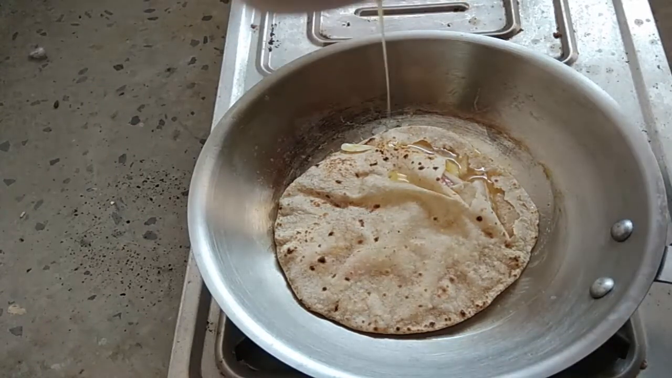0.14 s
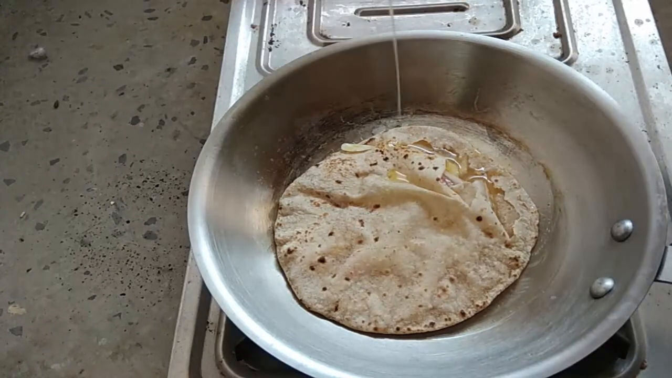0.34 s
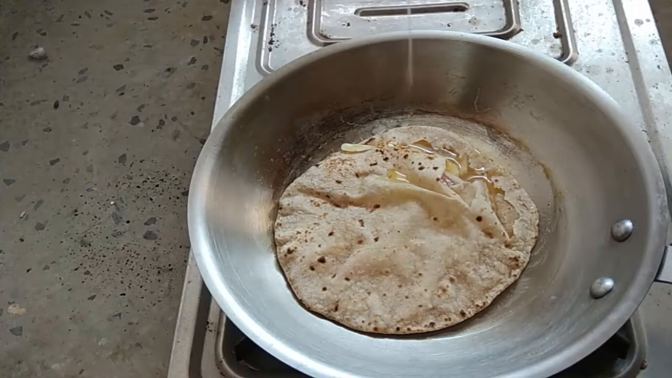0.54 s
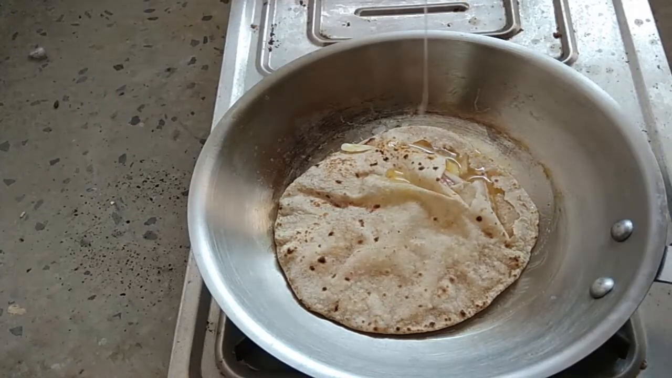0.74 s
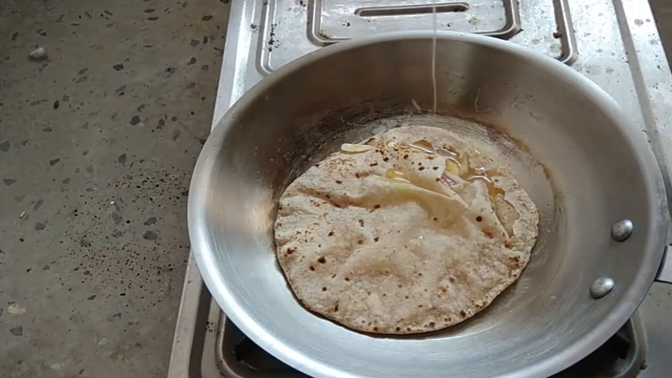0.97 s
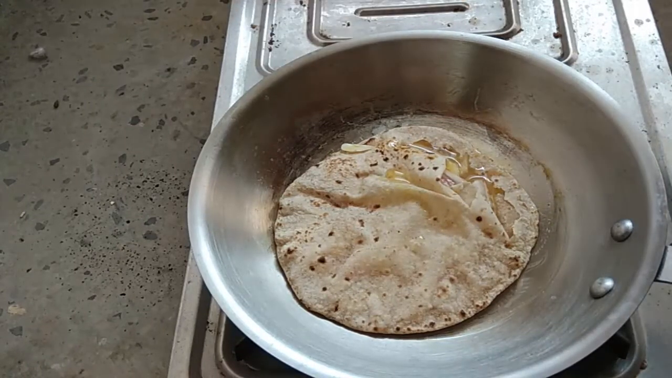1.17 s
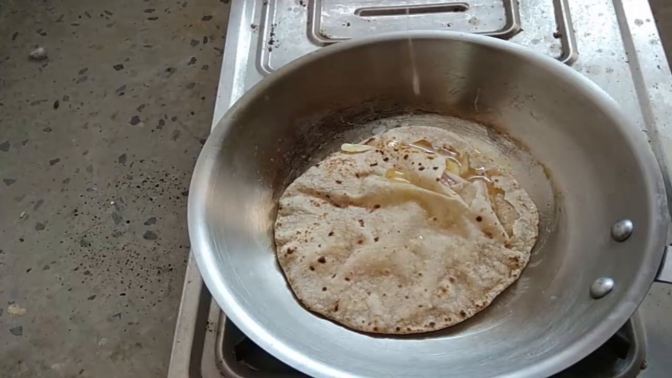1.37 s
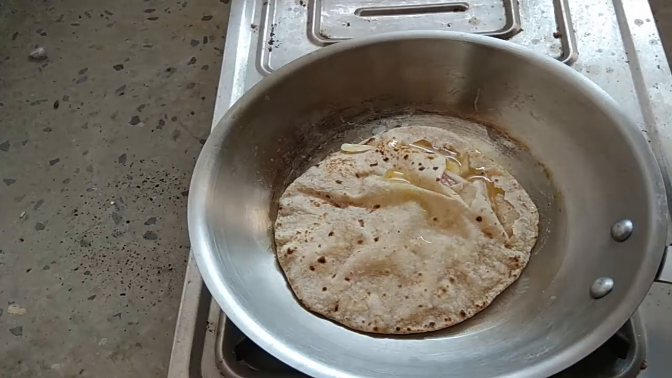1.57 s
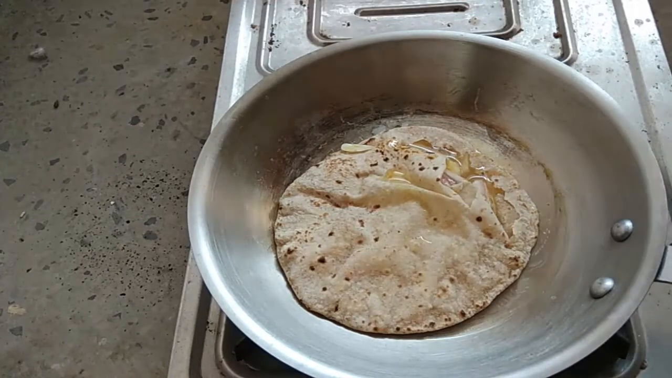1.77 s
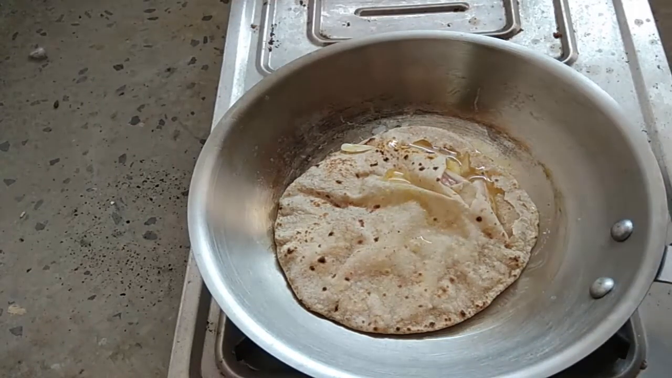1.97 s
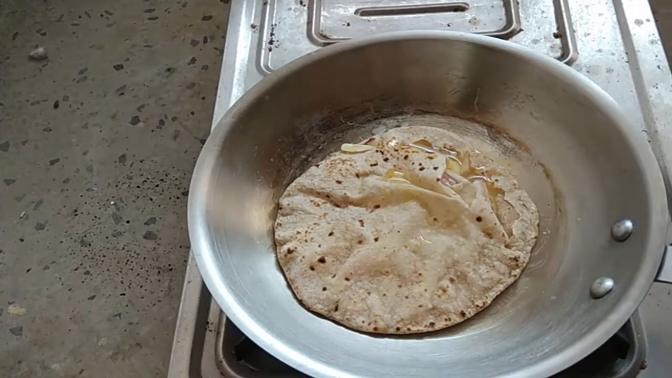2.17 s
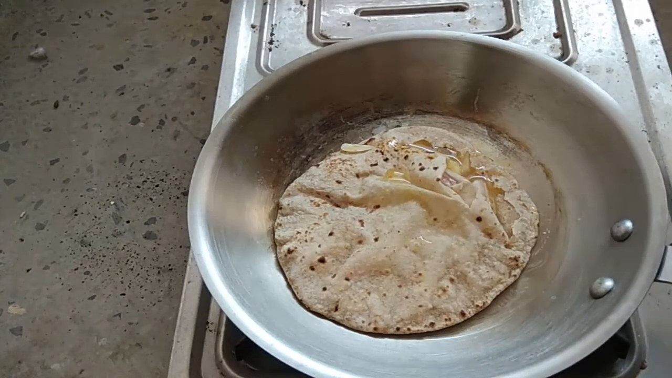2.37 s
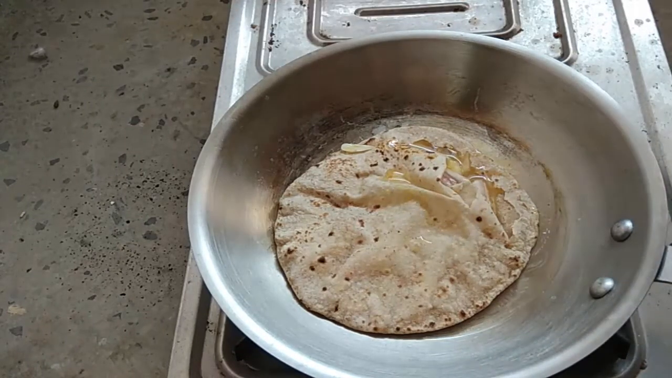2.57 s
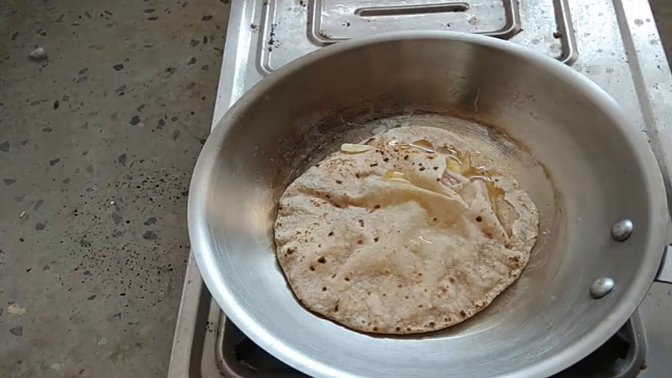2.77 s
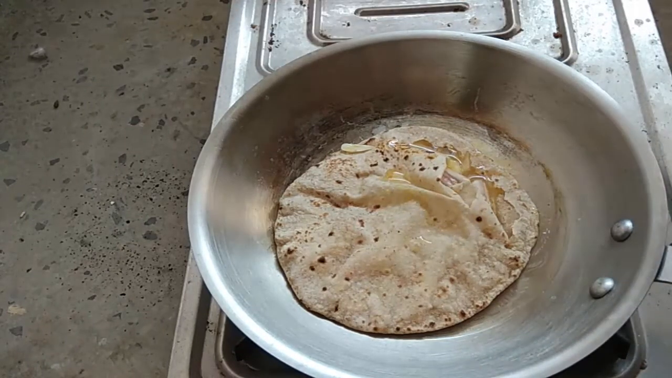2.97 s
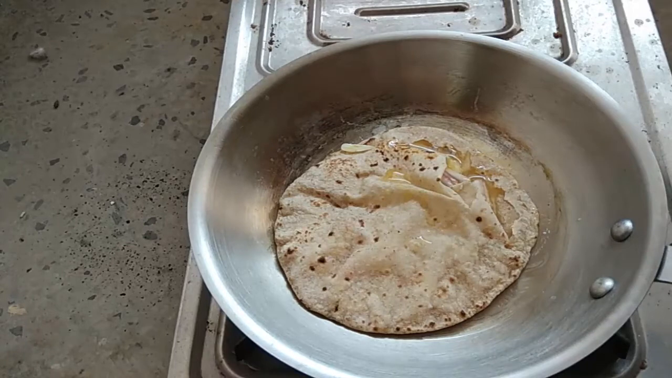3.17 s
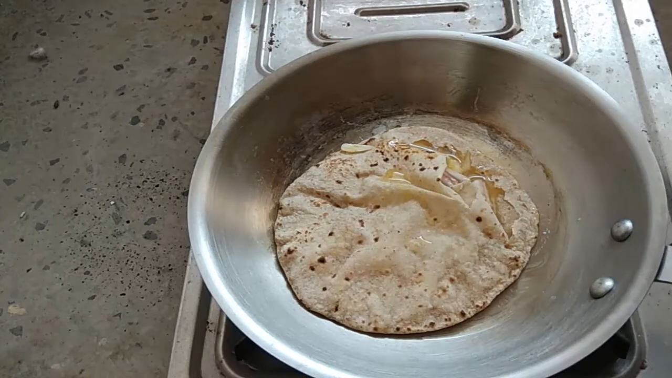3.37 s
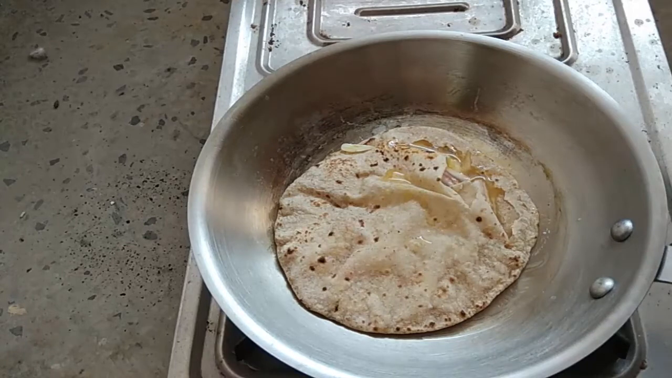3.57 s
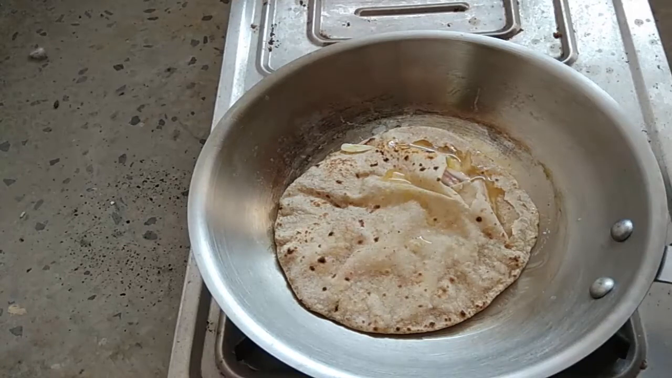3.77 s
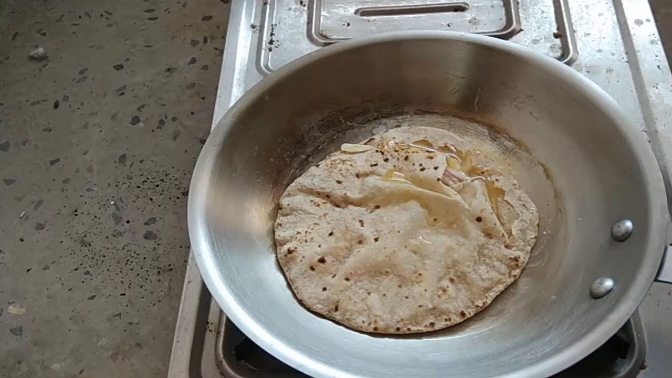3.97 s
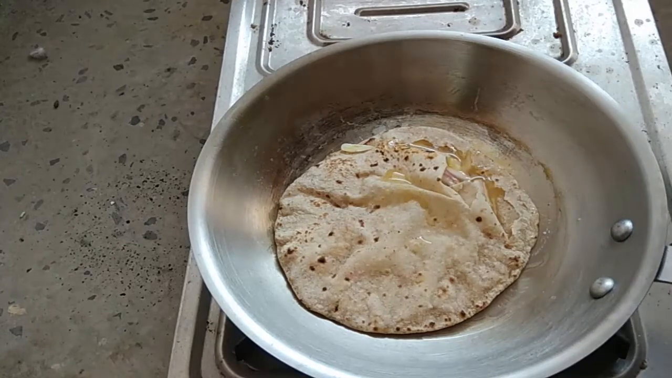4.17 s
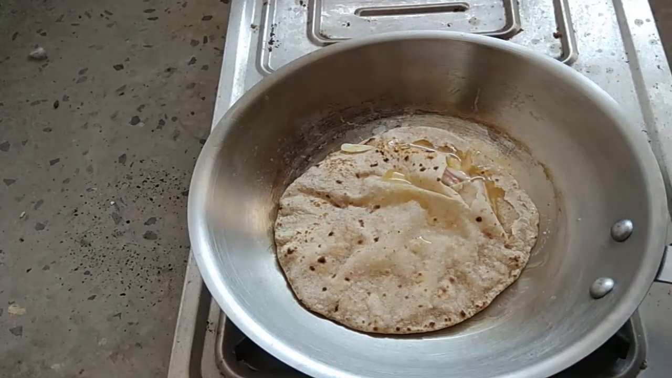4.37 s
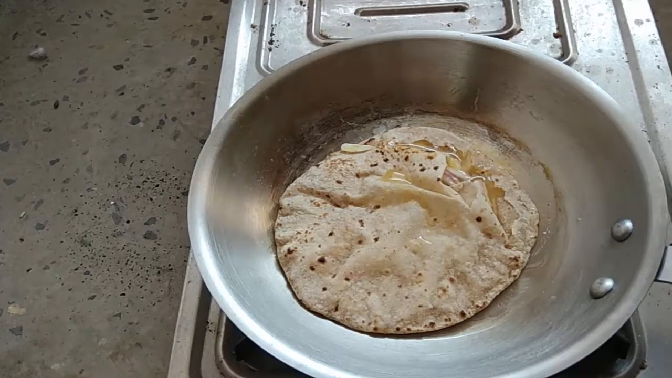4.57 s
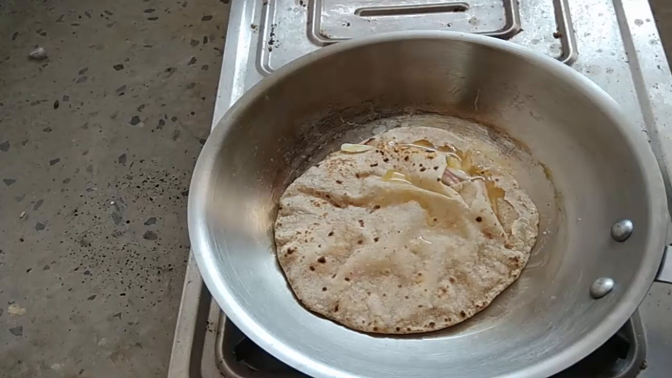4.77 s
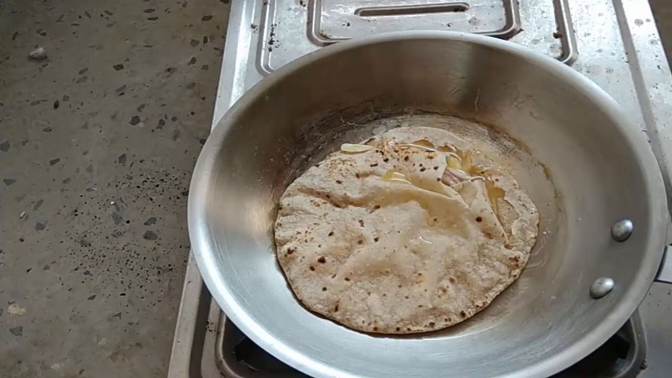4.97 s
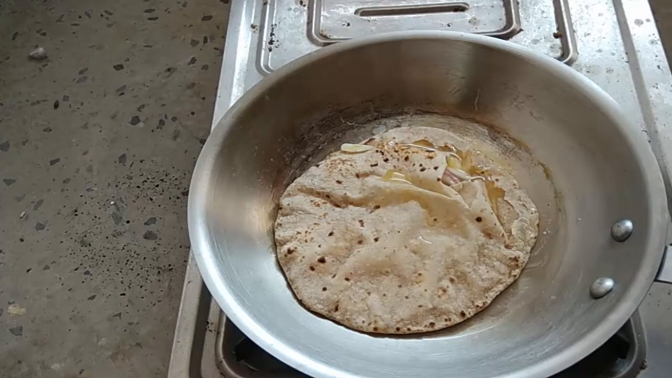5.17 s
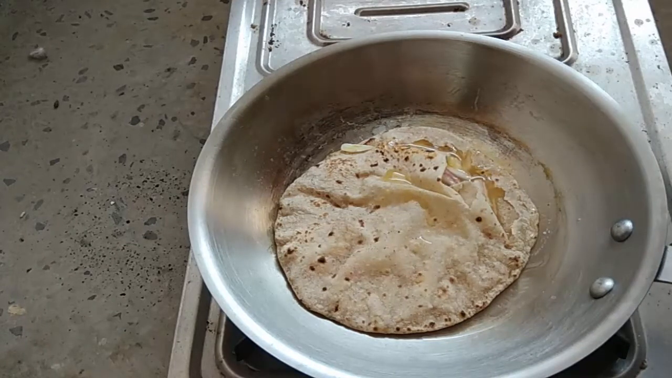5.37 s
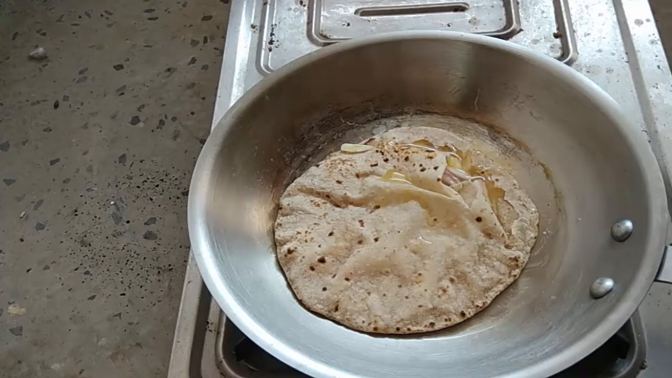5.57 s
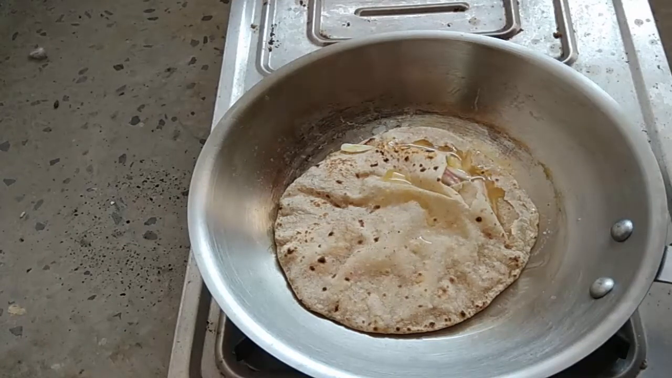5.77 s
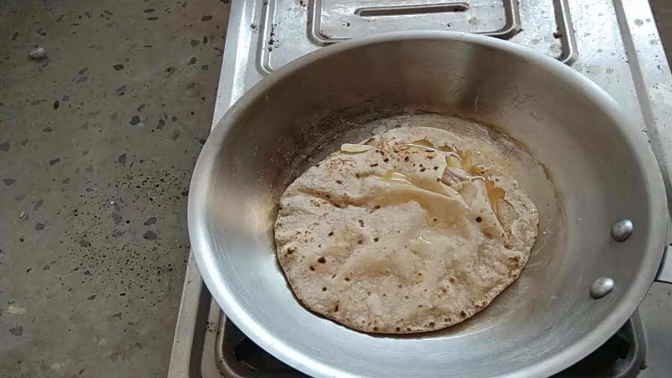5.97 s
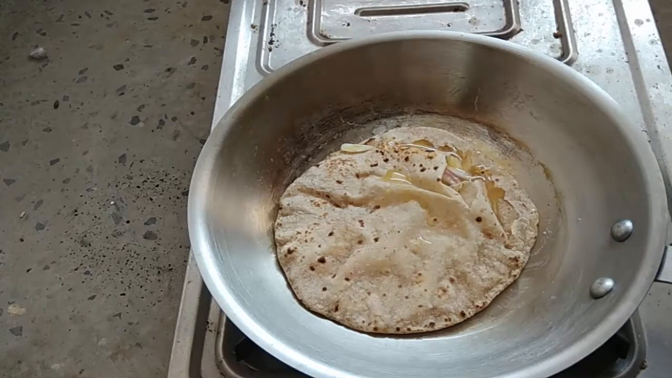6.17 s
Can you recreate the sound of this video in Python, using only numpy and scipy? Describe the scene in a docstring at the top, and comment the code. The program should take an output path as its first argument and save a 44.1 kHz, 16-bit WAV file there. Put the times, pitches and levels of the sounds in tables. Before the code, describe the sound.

Hot oil crackles and spits sharply in a steel pan, quickly settling to a thin sizzle with scattered pops; one metallic clack midway.

```python
"""Flatbread frying in oil

Oil poured on a flatbread fries in a steel pan, close below the microphone, in a hard-walled kitchen.
Random clicks, filtered and scattered by the pan, make the fine sizzle and dry ticks of tiny bubbles;
larger bubbles pop through a resonance with a spray of crackle and a short jet of steam.
A metal vessel lands, rocks and slides on the counter: decaying modes, thuds and resonant friction.
A faint low hum of wavering tones comes and goes over the soft filtered noise of burner and room."""
import sys
import numpy as np
from scipy import signal
from scipy.fft import rfft, irfft
from scipy.io import wavfile
from scipy.ndimage import uniform_filter1d

SR = 44100
rng = np.random.default_rng(int(sys.argv[2]) if len(sys.argv) > 2 else 0)


def generate_wav(sig):
    """Save sig (samples, or channels by samples) to the path in sys.argv[1] as 16-bit PCM at SR."""
    pcm = np.round(np.clip(np.atleast_2d(sig).T, -1, 1) * 32767).astype(np.int16)
    wavfile.write(sys.argv[1], SR, pcm)


N = 274743
TIME = np.arange(N) / SR
TOP_HZ = 15750  # top of the band

# base level of the frying through time: start_s [s], level_db [dB]
SIZZLE_LEVEL = [(0.0, -28.5), (0.06, -30), (0.17, -36), (0.35, -42), (1.02, -43), (1.66, -38),
                (1.86, -44.5), (2.06, -42), (2.22, -35.5), (2.48, -39), (2.79, -36), (2.92, -35),
                (3.33, -44), (3.85, -43), (4.15, -44), (4.29, -47.5), (5.17, -43), (5.45, -42.5),
                (5.88, -46.5), (6.23, -45.5)]
# blows of the vessel on the counter: start_s [s], level_db [dB, relative]
VESSEL_BLOWS = [(2.2828, -12), (2.2915, -27), (2.3085, -21.5), (2.3315, -30), (2.3635, -23), (2.383, -31),
                (2.441, -38)]


def undb(db):
    """Decibels to gain."""
    return 10 ** (np.asarray(db) / 20)


def unit(x):
    """Scale to an rms of 1."""
    return x / np.sqrt(np.mean(np.abs(x) ** 2))


def curve(rows, axis=1):
    """One column of a table as a line through time."""
    rows = np.array(rows)
    return np.interp(TIME, rows[:, 0], rows[:, axis])


def add(out, x, start_s):
    """Mix a stereo sound in at its start time."""
    i = max(int(start_s * SR), 0)
    out[:, i:i + x.shape[1]] += x[:, :N - i]


def pan(x, left_over_right_db):
    """Place a sound by the level of the left channel over the right."""
    return x * undb([[left_over_right_db / 2], [-left_over_right_db / 2]])


def convolve(x, response):
    """Pass a sound through a response, keeping its length."""
    full = signal.oaconvolve(np.atleast_2d(x), np.atleast_2d(response), axes=1)
    return full[:, :x.shape[-1]]


def colour(x, points, size=1024):
    """Minimum-phase filter through (Hz, dB) points that keeps the power of white noise."""
    hz, db = np.transpose(points)
    f = np.maximum(np.fft.rfftfreq(size, 1 / SR), 1)
    gain = undb(np.interp(np.log(f), np.log(hz), db))
    # folding the cepstrum forward makes the filter causal
    cepstrum = irfft(np.log(gain))
    cepstrum[1:size // 2] *= 2
    cepstrum[size // 2 + 1:] = 0
    response = irfft(np.exp(rfft(cepstrum)))
    return convolve(x, response / np.linalg.norm(response))


def resonate(x, hz, width_hz):
    """Two-pole resonance, gain 1 at its centre."""
    b, a = signal.iirpeak(min(hz, TOP_HZ), hz / width_hz, fs=SR)
    return signal.lfilter(b, a, x)


def walk(rate_hz):
    """Smooth random wander with a spread near 1."""
    k = int(SR / rate_hz)
    steps = np.repeat(rng.standard_normal(N // k + 1), k)
    return unit(uniform_filter1d(steps, k))[:N]


def grains(count, per_s, spread_db, limit=9.1):
    """Random clicks of unit power: mostly tiny, a few large; limit caps the largest."""
    chance = rng.random(count)
    there = np.flatnonzero(chance < per_s / SR)
    rank = chance[there] * SR / per_s + 1e-12
    size = undb(spread_db * np.minimum(-np.log(rank), limit))
    sign = 2 * rng.integers(0, 2, count, dtype=np.int8)[there] - 1
    out = np.zeros(count)
    out[there] = size * sign
    return unit(out + 1e-12)


def room(x, t60_s, wet_db, build_s=0.0021):
    """Diffuse kitchen echo: decaying noise, unrelated in the two channels, that builds up quickly."""
    t = TIME[:SR]
    envelope = undb(-60 * t / t60_s) * (1 - np.exp(-t / build_s))
    tail = rng.standard_normal((2, SR)) * envelope
    tail /= np.linalg.norm(tail, axis=1, keepdims=True)
    return x + undb(wet_db) * convolve(x, tail)


def air(air_db=-66):
    """Soft rush of the burner and the room: coloured noise, drifting a little in level."""
    # spectrum of the rush: pitch_hz [Hz], level_db [dB per Hz, relative]
    air_colour = [(25, -14), (60, -5), (150, 0.5), (400, -4), (800, -17), (2000, -10), (15000, -37)]
    drift_db = 2.5 * walk(1.7)
    return colour(rng.standard_normal((2, N)), air_colour) * undb(air_db + drift_db)


def hum(upper_ratio=1.22, upper_waver_hz=24, upper_db=-4, steady_db=-2, side_db=-7,
        attack_s=0.066, release_s=0.06):
    """Faint low swells: each a gliding tone wavered by slow noise, with a noisier tone just above it."""
    # swells: start_s [s], length_s [s], first_hz [Hz], last_hz [Hz], level_db [dB], waver_hz [Hz]
    hum_swells = [(.1, 0.25, 182.7, 164.6, -55.5, 25), (0.489, 0.18, 380.7, 410, -55.5, 25),
                  (1.3, 0.47, 188.8, 169.4, -62, 23), (2.07, .15, 640, 520, -59, 40),
                  (2.79, 0.39, 156.4, 144, -49, 9), (3.38, 0.25, 145.8, 143.7, -64.5, 10),
                  (4.251, 0.21, 340.5, 398, -64, 16), (4.3, 0.35, 174, 163, -62, 23),
                  (4.548, 0.24, 159.6, 139.4, -52.5, 30), (5.051, 0.146, 415, 398, -61.5, 14),
                  (5.071, .07, 737, 684, -63, 63), (5.2, 0.21, 167, 151, -59, 18),
                  (5.629, 0.34, 161.9, 150.5, -56.5, 13), (6.15, 0.17, 162, 153, -58, 14)]
    out, t = np.zeros((2, N)), TIME[:SR]
    for start_s, length_s, first_hz, last_hz, level_db, waver_hz in hum_swells:
        mid, side = rng.standard_normal((2, SR)) + 1j * rng.standard_normal((2, SR))
        noise = mid + undb(side_db) * side * np.array([[1], [-1]])

        def waver(cutoff_hz):
            return unit(signal.sosfilt(signal.butter(2, cutoff_hz, fs=SR, output="sos"), noise))

        along = np.minimum(t / length_s, 1)
        glide_hz = first_hz + (last_hz - first_hz) * along
        phase = 2j * np.pi * np.cumsum(glide_hz) / SR
        lower = (undb(steady_db) + waver(waver_hz)) * np.exp(phase)
        upper = undb(upper_db) * waver(upper_waver_hz) * np.exp(upper_ratio * phase)
        swell = np.minimum(t / attack_s, 1) * np.exp(-np.maximum(t - length_s, 0) / release_s)
        tone = unit(np.real(lower + upper) * swell)
        add(out, tone * np.sqrt(np.mean(swell ** 2)) * undb(level_db), start_s)
    return out


def slide(judder_db=2.5, patchy_db=2.6, catches_per_s=3000, bite_db=-22, bite_s=0.0083,
          attack_s=0.014, release_s=0.03, fade_db_per_s=25):
    """Metal scrapes faintly, bites into the stone counter as it lands, then slips, waking resonances."""
    # shoves along the counter: start_s [s], length_s [s], level_db [dB, before the fade]
    shoves = [(2.09, .17, -43), (2.27, .115, -28), (2.45, .13, -35.5), (2.6, .24, -31.5)]
    # resonances that sliding excites: pitch_hz [Hz], width_hz [Hz, each of two passes], level_db [dB, relative]
    scrape_modes = [(470, 300, -11), (720, 400, -12), (1210, 260, 2.5), (1420, 300, -2), (2000, 900, -7),
                    (4680, 260, 6.5), (5150, 300, -2), (6350, 300, 6.5), (7050, 400, 1), (7600, 360, 3.5),
                    (8350, 480, 4.5), (10600, 700, 4.5), (11400, 750, 2), (12900, 1000, 1)]
    slips = np.array([grains(N, catches_per_s, 2.1, limit=5.7) for _ in range(2)])
    slips = slips * undb(judder_db * walk(70))
    landed = TIME - VESSEL_BLOWS[0][0]
    push = undb(bite_db) * (landed > 0) * np.exp(-np.abs(landed) / bite_s)
    # each shove starts quickly, slows and stops
    for start_s, length_s, level_db in shoves:
        t = np.maximum(TIME - start_s, 0)
        rise = np.minimum(t / attack_s, 1)
        stop = np.exp(-np.maximum(t - length_s, 0) / release_s)
        push += undb(level_db - fade_db_per_s * t) * rise * stop
    scrape = np.zeros((2, N))
    for hz, width_hz, level_db in scrape_modes:
        ringing = resonate(resonate(slips, hz, width_hz), hz, width_hz)
        scrape += undb(level_db + patchy_db * walk(35)) * ringing
    return unit(scrape) * push


def crunch(crunch_db=-23, crunch_s=0.0095, grit_hz=9000, width_hz=7000, count=2000):
    """Grit crunches under the rim at the first blow: a decaying burst of clicks through a resonance."""
    out = np.zeros((2, N))
    grit = np.array([grains(count, 8800, 1.8) for _ in range(2)]) * np.exp(-TIME[:count] / crunch_s)
    grit = resonate(grit, grit_hz, width_hz) * np.sqrt(SR / 2 / width_hz)
    add(out, grit * undb(crunch_db), VESSEL_BLOWS[0][0])
    return out


def knock(clack_db=5, thud_db=-1.5, ring_db=-17.5, thud_s=0.0017, clack_s=0.0013, clack_hz=1320,
          port_turns=0.44):
    """The vessel lands with a clack and a thud that fills the room, rings in its modes and rocks to rest."""
    # modes of the vessel: pitch_hz [Hz], level_db [dB, relative], t60_s [s]
    vessel_modes = [(716, -16, .4), (834, -11, .4), (931, -12, .35), (1060, -9, .3), (1190, 1, .55),
                    (1272, -3, .5), (1324, -3, .3), (1404, -4, .35), (1427, -5, .4), (1554, -10, .25),
                    (1933, -5, .22), (2570, -8, .12), (4660, -6, .13), (6310, -7, .13)]
    # spectrum of the thud: pitch_hz [Hz], level_db [dB per Hz, relative]
    thud_colour = [(60, -35), (250, -28), (500, -14.5), (850, -8), (1200, 0), (1400, -5), (1650, -4.5),
                   (2000, -9.5), (2600, -13.5), (3500, -40), (15000, -42)]
    clacks, thuds, rings = np.zeros((3, 2, N))
    t = TIME[:SR]
    late = np.array([[port_turns], [0]])  # cycles; the vessel stands off to one side
    contact = t / clack_s
    clack = np.sin(2 * np.pi * (clack_hz * t - late)) * contact * np.exp(1 - contact)
    for start_s, level_db in VESSEL_BLOWS:
        ring = np.zeros((2, SR))
        for hz, mode_db, t60_s in vessel_modes:
            decay = np.exp(-np.log(1000) * t / t60_s)
            ring += undb(mode_db) * decay * np.sin(2 * np.pi * (hz * t + rng.random((2, 1))))
        thud = colour(rng.standard_normal((2, SR)) * np.exp(-t / thud_s), thud_colour)
        add(clacks, undb(level_db + clack_db) * clack, start_s)
        add(thuds, undb(level_db + thud_db) * thud, start_s)
        add(rings, undb(level_db + ring_db) * ring, start_s)
    rings = room(rings, t60_s=0.8, wet_db=-4)
    thuds = room(thuds, t60_s=1.0, wet_db=4.0, build_s=0.0024)
    return clacks + rings + thuds


def bowl(scatter_db, ring_s, wall_s=0, count=300, lag=5, lag_spread=3):
    """Paths from a spot in the pan to two microphone ports: direct, then scattered round wall_s by steel."""
    t = np.arange(count) / SR
    paths = rng.standard_normal((2, count)) * np.exp(-np.abs(t - wall_s) / ring_s)
    paths[:, :2 * lag] = 0
    paths *= undb(scatter_db) / np.linalg.norm(paths, axis=1, keepdims=True)
    # the right port is nearer; the left hears the direct sound about lag samples later
    paths[0, rng.integers(lag - lag_spread, lag + lag_spread + 1)] += 1
    paths[1, 0] += 1
    return paths / np.sqrt(np.sum(paths ** 2) / 2)


def bubbling(per_s, spread_db, count=6, limit=7):
    """Bursting bubbles at several spots round the bread: random clicks, each spot with its own paths."""
    out = np.zeros((2, N))
    for _ in range(count):
        paths = bowl(scatter_db=-2, ring_s=0.001)
        out += convolve(grains(N, per_s / count, spread_db, limit), paths)
    return unit(out)


def sizzle(coarse_db=-6, mist_db=-2.0, flutter_db=1.92, refining_db_per_s=0.87, mist_pan_db=2):
    """Two sizes of steam bubble flutter together; the fine mist gains as the oil spreads thin."""
    # spectra of coarse bubbles and fine mist: pitch_hz [Hz], level_db [dB per Hz, relative]
    coarse_colour = [(60, -6), (300, -8.5), (700, -7), (1500, -3), (3000, -1), (5000, -1.5), (8000, 0.5),
                     (10500, 4.5), (15500, -8)]
    mist_colour = [(60, -43), (3000, -13.5), (7000, -9), (10000, 0.5), (12500, -0.5), (15500, 0.5)]
    coarse = colour(bubbling(per_s=2400, spread_db=3.5, limit=4.3), coarse_colour) * undb(coarse_db)
    mist = colour(bubbling(per_s=5500, spread_db=1.0), mist_colour)
    mist = pan(mist * undb(mist_db + refining_db_per_s * TIME), mist_pan_db)
    return (coarse + mist) * undb(curve(SIZZLE_LEVEL) + flutter_db * walk(61))


def ticks(tick_db=5.0, fade_db_per_s=2.0, bunching_db=3.5):
    """Droplets burst with dry ticks in little bunches, ever weaker against the sizzle as the oil ages."""
    # spectrum of the ticks: pitch_hz [Hz], level_db [dB per Hz, relative]
    droplet_colour = [(60, -12), (1500, -12), (3200, -12.5), (8000, -5), (12000, -2), (15500, 1.5)]
    droplets = bubbling(per_s=520, spread_db=4.6, limit=4.2)
    level_db = curve(SIZZLE_LEVEL) + tick_db - fade_db_per_s * TIME + bunching_db * walk(55)
    return colour(droplets * undb(level_db), droplet_colour)


def pop(start_s, strength_db, hz, width_hz, share, jet_db, body_db, pan_db, snap_db=-1.0,
        crack_db=-9, crack_hz=7000, spray_s=0.004, wall_db=-7, body_wall_db=1.5, wall_s=0.002,
        jet_s=0.055, jet_body_db=-9, body_hz=2900, count=9000, lead=400):
    """A bubble snaps amid crackle, echoed by the pan wall; steam then jets out. Gives sound and start."""
    t = (np.arange(count) - lead) / SR
    share = np.clip(share, 0, 1)
    spray = grains(count, 3500, 3.3) * np.exp(-0.5 * (t / spray_s) ** 4)
    spray = spray / np.linalg.norm(spray) * np.sqrt(share)
    snap = (t == 0) * np.sqrt(1 - share) * undb(snap_db)
    # strength counts the burst's energy as if spread over one millisecond
    burst = (snap + spray) * undb(strength_db) * np.sqrt(SR / 1000)
    steam = np.array([grains(count, 5900, 4.8, limit=5.6) for _ in range(2)])
    steam = steam * (t > 0) * np.exp(-t / jet_s) * undb(jet_db)
    through_air = convolve(burst, bowl(wall_db, 0.001, wall_s, lag=4, lag_spread=1)) + steam
    through_pan = convolve(burst, bowl(body_wall_db, 0.0012, wall_s / 2)) + steam * undb(jet_body_db)
    # the size of the cavity sets its pitch
    bright = resonate(through_air, hz, width_hz) * np.sqrt(SR / 2 / width_hz)
    # the tear itself cracks across the treble
    b, a = signal.butter(1, min(crack_hz, TOP_HZ), "high", fs=SR)
    bright = bright + undb(crack_db) * signal.lfilter(b, a, through_air)
    # the pan below adds a dull body
    b, a = signal.butter(2, body_hz, fs=SR)
    dull = signal.lfilter(b, a, through_pan) * np.sqrt(SR / 2 / body_hz)
    return pan(bright - dull * undb(body_db), pan_db), start_s - lead / SR


def pops(scatter_db=4, small_pop_db=7, small_jet_db=-20, small_body_db=-16, small_width_hz=5500,
         low_hz=9500, high_hz=13500, fresh_per_s=30, settled_per_s=5, settle_s=2.2,
         pour_pan_db=8, settled_pan_db=4, spread_s=2, count=130):
    """Loud pops at set times, and small ones by chance that thin out as the oil settles."""
    # loudest pops: start_s [s], strength_db [dB], pitch_hz [Hz], width_hz [Hz], spray_share [0-1 of power],
    # jet_db [dB], body_db [dB, relative to strength], left_over_right_db [dB]
    loud_pops = [(0.0414, -17.5, 12700, 3980, 0.6, -24.5, -12.5, 2.5),
                 (0.0805, -12.5, 13600, 4000, 0.8, -45, -11.5, 1.5),
                 (0.1444, -22, 13500, 5500, 0, -48, -16, 3),
                 (0.1523, -15.5, 14000, 5500, 0.26, -42, -15, 11.5),
                 (0.1651, -17, 14000, 4000, 0.2, -40, -10, 6),
                 (0.2367, -16.5, 9300, 4000, 0.2, -33, -16.5, -1),
                 (0.249, -8, 13500, 4000, 0.12, -28, -13.5, 3),
                 (0.3142, -17.5, 13000, 4000, 0.24, -38, -9, 3.5),
                 (0.3278, -20.5, 12000, 2980, 0.5, -45, -12, 10),
                 (0.3498, -17.5, 13750, 4000, 0, -50, -19, 2),
                 (0.3818, -19, 12900, 7000, 0, -58, -14.5, -3),
                 (0.384, -19, 13100, 4030, 0.25, -63, -28, 6),
                 (0.5065, -22.5, 13400, 4000, 0.5, -55, -16.5, 1),
                 (0.529, -19.5, 12400, 3000, 0, -38, -28, 1), (0.5313, -23, 13900, 4000, 0.3, -39, -15, -1),
                 (0.5908, -10.5, 12500, 6900, 0.89, -28.5, -12.5, 2.5),
                 (0.6528, -17.5, 10250, 4000, 0.1, -47, -13, -1),
                 (0.6614, -17, 13800, 5500, 0.5, -45, -15, 4),
                 (0.674, -15.5, 11800, 3000, 0.2, -39, -9.5, 0.5),
                 (0.8035, -18.0, 13900, 4000, 0.14, -33.5, -15, -0.5),
                 (0.9146, -18.5, 12400, 5500, 0.2, -46, -17.5, 0),
                 (1.0476, -19, 13500, 5500, 0.05, -39, -14, 6),
                 (1.1007, -19, 14000, 5500, 0.3, -48, -19.5, 0),
                 (1.198, -15.5, 12750, 5500, 0.05, -45, -18.5, 2),
                 (1.2215, -15.5, 10800, 3000, 0.13, -48, -16, 1),
                 (1.243, -20, 11250, 3000, 0.3, -54, -17.5, -2),
                 (1.3087, -38, 7250, 2000, 0.1, -58, -21, -1),
                 (1.3321, -17, 13500, 4000, 0.03, -55, -23, -1),
                 (1.356, -21, 14000, 5500, 0.05, -58, -4.5, 3),
                 (1.3691, -23, 12750, 3000, 0.2, -62, -21, 5),
                 (1.4469, -19.5, 9800, 4000, 0.14, -48, -19.5, -2),
                 (1.5068, -31, 13250, 5550, 0, -60, -23, 7), (1.5393, -26, 13500, 2000, 0.02, -50, -22, 9),
                 (1.5466, -11, 8750, 7000, 0.27, -51, -16.5, 0),
                 (1.5943, -22.5, 10600, 2000, 0, -52, -16, -9),
                 (1.6128, -16.5, 13100, 7000, 0.3, -32.5, -11.5, 1),
                 (1.7408, -12, 11600, 4000, 0.07, -58, -11, 0),
                 (1.8505, -22, 13500, 6940, 0.9, -39.5, -18.5, 3),
                 (2.0115, -34, 13100, 4000, 0.1, -58, -3.5, 7),
                 (2.0249, -22.5, 11750, 7000, 0.8, -39.5, -12.5, 1.5),
                 (2.089, -22.5, 12100, 4000, 0.8, -42, -9.5, 4),
                 (2.444, -13.5, 10100, 4000, 0.95, -51, -18.5, -1),
                 (2.5352, -20, 13000, 5500, 0.4, -49, -9, -2),
                 (2.5638, -21, 14000, 3000, 0.4, -48, -8.5, 5),
                 (2.6047, -15.5, 9900, 3000, 0.4, -39, -9.5, -2), (2.851, -24, 7500, 3000, 0, -57, -23, -9),
                 (2.867, -13.5, 14000, 9000, 0.8, -54, -12.5, 1.5),
                 (2.9419, -15, 14000, 7000, 0.6, -43, -14.5, 2),
                 (3.0273, -19, 12300, 7000, 0.5, -38, -15.5, 2),
                 (3.1519, -27, 12600, 4000, 0.03, -41.5, -11, 5.5),
                 (3.5866, -23.5, 13750, 7000, 0.1, -41.5, -19.5, -1),
                 (3.646, -15, 9200, 2000, 0.02, -38, -16.5, -2),
                 (3.7184, -24, 12800, 7000, 0.7, -52, -16, -2),
                 (3.7698, -21.5, 13000, 3000, 0.02, -52, -11, -0.5),
                 (3.8548, -24, 12000, 3000, 0.4, -60, -9, 2),
                 (3.9423, -17.0, 12900, 4000, 0.1, -55, -22, -2),
                 (4.0865, -15, 10900, 4000, 0.08, -44, -12, -2),
                 (4.1447, -26, 11750, 4000, 0, -56, -21, -2), (4.1568, -26, 8500, 9000, 0, -57, -19, 2),
                 (4.203, -25, 11900, 9000, 0.36, -42.5, -10.5, 1),
                 (4.3141, -17.5, 7500, 4000, 0, -62, -12.5, -1.5),
                 (4.5169, -24.5, 12400, 2000, 0.1, -44, -15.5, -3),
                 (4.5389, -24.5, 12900, 3000, 0.2, -39.5, -15, -1.5),
                 (4.7223, -31, 13000, 3000, 0.2, -41.5, -14, 0),
                 (5.1103, -30, 14000, 5500, 0.8, -55, -3, 2),
                 (5.2983, -25.5, 9800, 7000, 0, -41.5, -12.5, 0),
                 (5.3436, -23, 10750, 9000, 0.5, -46, -23, 2),
                 (5.4375, -10, 14000, 9000, 0.83, -47, -17, 2),
                 (5.4404, -9, 11300, 5500, 0.05, -33, -9.5, 1),
                 (5.5686, -13.5, 9400, 4000, 0.24, -53, -13, -0.5),
                 (5.5744, -22, 9750, 5500, 0.45, -50, -14.5, -2),
                 (6.0873, -23, 11750, 6960, 0.63, -47, -14, -1.5),
                 (6.183, -20.0, 13750, 3000, 0.85, -53, -17.5, -1.5)]
    # colour the pan gives the pops: pitch_hz [Hz], level_db [dB, relative]
    pan_colour = [(30, -5.5), (100, -1), (300, -2.5), (700, -2), (1600, 0), (3200, 0), (6000, 0),
                  (10000, 1), (15500, -1)]
    out = np.zeros((2, N))
    for row in loud_pops:
        add(out, *pop(*row))
    # running count of the small pops due by each moment
    rate_per_s = settled_per_s + (fresh_per_s - settled_per_s) * np.exp(-TIME / settle_s)
    due = np.cumsum(rate_per_s) / SR
    level_db = curve(SIZZLE_LEVEL) + small_pop_db
    for k, (when, size, share, pitch) in enumerate(rng.random((count, 4))):
        i = np.searchsorted(due, k + when)
        if i < N:
            db = level_db[i] + scatter_db * (2 * size - 1)
            hz = low_hz + pitch * (high_hz - low_hz)
            # they start left of centre and move nearer to it as the oil spreads
            pan_db = settled_pan_db + (pour_pan_db - settled_pan_db) * np.exp(-TIME[i] / spread_s)
            add(out, *pop(TIME[i], db, hz, small_width_hz, share ** 2, db + small_jet_db,
                          small_body_db, pan_db))
    return colour(out, pan_colour)


def scene():
    """Pops, ticks and grit echo in the kitchen over the sizzle, the vessel, the hum and the burner."""
    crackle = room(pops() + ticks() + crunch(), t60_s=0.55, wet_db=-6.5)
    return air() + hum() + slide() + knock() + sizzle() + crackle


def record(dry):
    """Soft saturation rounds the highest peaks; a steep low-pass cuts the top of the band."""
    low_pass = signal.ellip(10, 0.2, 70, TOP_HZ, fs=SR, output="sos")
    return signal.sosfilt(low_pass, np.tanh(dry))


dry = scene()
out = record(dry)
generate_wav(out)
```